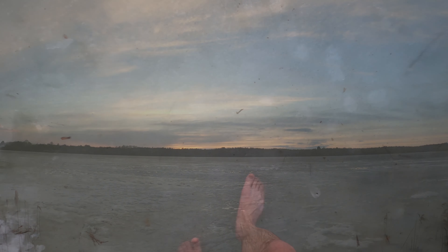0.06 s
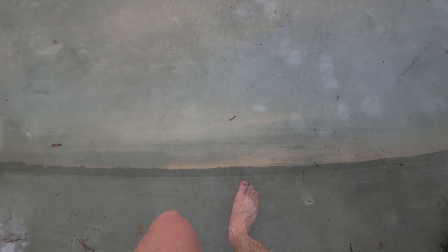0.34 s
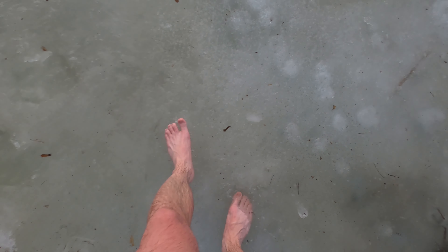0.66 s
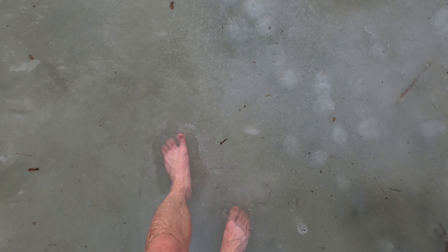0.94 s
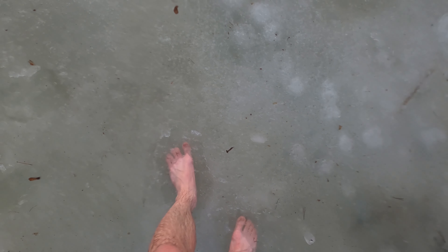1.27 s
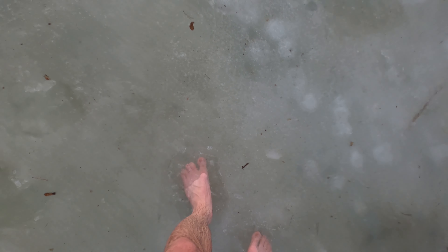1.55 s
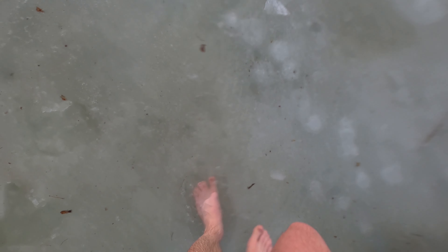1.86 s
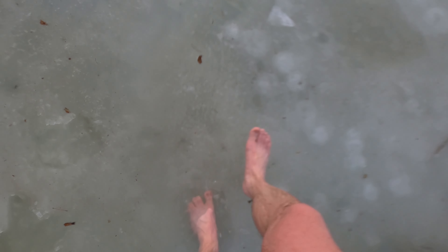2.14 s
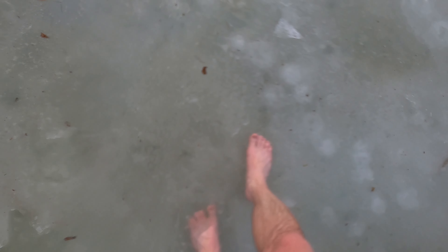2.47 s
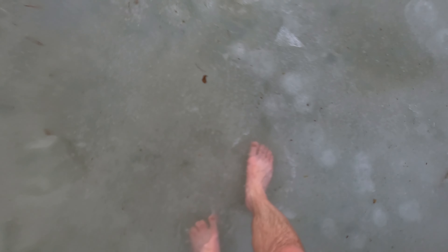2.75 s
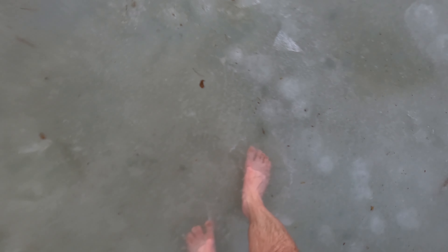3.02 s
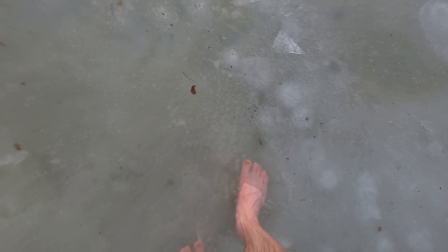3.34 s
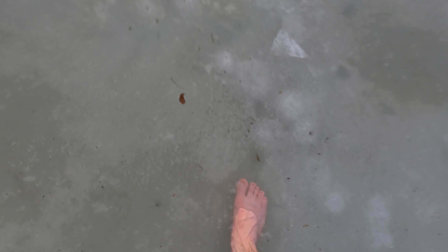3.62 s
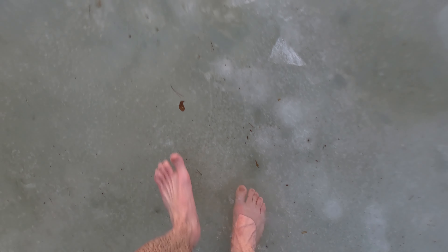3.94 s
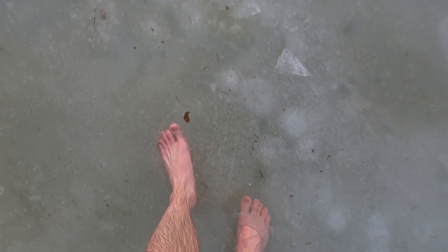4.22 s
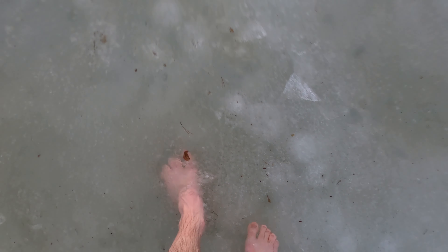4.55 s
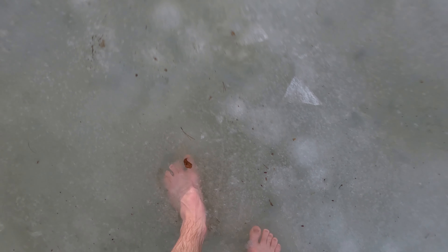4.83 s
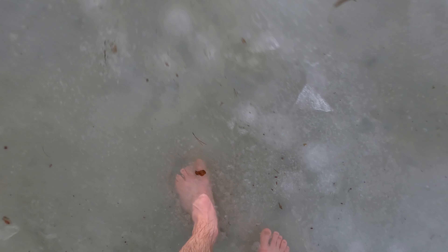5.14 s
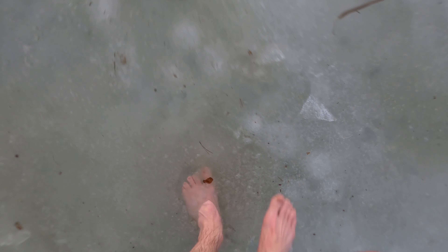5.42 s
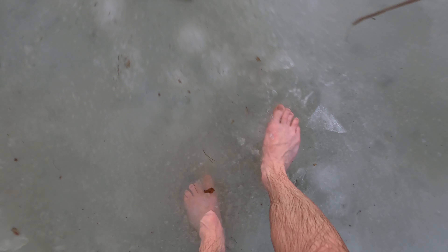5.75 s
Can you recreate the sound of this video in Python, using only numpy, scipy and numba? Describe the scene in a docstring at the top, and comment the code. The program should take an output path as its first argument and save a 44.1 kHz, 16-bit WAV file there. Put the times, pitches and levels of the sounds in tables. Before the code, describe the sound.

Bare feet wade slowly through a few centimetres of water on a frozen lake. Each foot lifts with a gurgle and plinking drips, throws a little spray, then sinks back with a soft slosh and fading fizz. About four unhurried steps pass, with the sharpest splashes in the second half. A few dull low thumps come between them. The sound is close and dry, with no echo, over a very faint outdoor hush.

```python
"""Wading through meltwater on ice.

Bare feet wade slowly through a few centimetres of water on a frozen lake, in still open air.
Each foot churns up big bubbles, throws spray and leaves fizzing foam. The lifted foot drips,
and the drops slap and ring as bubbles of rising pitch. Two close microphone ports hear it.
Now and then comes a dull low thump, from a footfall or a puff or bump at the microphone."""
import sys
import numpy as np
from scipy import signal
from scipy.fft import rfft, irfft, next_fast_len
from scipy.io import wavfile
from numba import njit

SR = 44100
rng = np.random.default_rng(int(sys.argv[2]) if len(sys.argv) > 2 else 0)


def inscribe(sig):
    """Save sig as 16-bit PCM at rate SR to the path in sys.argv[1].

    A 1-D sig is mono; a 2-D sig holds one channel per row.
    Samples are clipped to [-1, 1] before scaling.
    """
    pcm = np.round(np.clip(np.atleast_2d(sig).T, -1, 1) * 32767)
    wavfile.write(sys.argv[1], SR, pcm.astype(np.int16))


N = 255339

# Bubble cloud spectra: freq_hz, gain_db
CHURN_SPECTRUM = [(70, -45.5), (130, -14), (200, -4.5), (320, -5), (480, -3), (700, -6.5), (1000, -7),
                  (1600, -10)]
SPLASH_SPECTRUM = [(450, -29), (750, -17), (1100, -3), (1900, 0.5), (2800, -0.5), (3600, -6.5),
                   (5000, -9.5), (8000, -50.5)]
FOAM_SPECTRUM = [(2000, -35), (3300, -6), (4300, -4), (5800, -5), (7400, -7), (8600, -14), (11000, -16.5),
                 (15000, -21)]


def wash(churning, splashing, gurgling, fizzing):
    """Big pockets churn under the sole, spray crackles, the footprint gurgles shut, foam fizzes."""
    churn = cloud(churning, CHURN_SPECTRUM, low_hz=123.5, high_hz=1300, cycles=4.9, glide=.27,
                  scatter_db=2, crowding=.22, spread_samples=.15, count=6000)
    splash = cloud(splashing, SPLASH_SPECTRUM, low_hz=600, high_hz=5000, cycles=15, glide=.25,
                   scatter_db=3, crowding=.38, spread_samples=.15, count=16000)
    gurgle = cloud(gurgling, SPLASH_SPECTRUM, low_hz=650, high_hz=3600, cycles=32, glide=.55,
                   scatter_db=3, crowding=.18, spread_samples=.26, count=3600)
    foam = cloud(fizzing, FOAM_SPECTRUM, low_hz=2800, high_hz=15000, cycles=36, glide=.041,
                 scatter_db=5, crowding=.32, spread_samples=.47, count=56000)
    return undb(-4) * churn + undb(-.5) * splash + gurgle + undb(4.5) * foam


def cloud(stir, spectrum, low_hz, high_hz, cycles, glide, scatter_db, crowding, spread_samples, count):
    """A swarm of bubbles of all sizes: harder stirring makes them more numerous and louder."""
    when, pitch, luck, length, sign = rng.random((count, 5)).T
    loud, place = rng.standard_normal((count, 2)).T
    start_s = when * N / SR
    strength = stir[(when * N).astype(int)]
    chance = np.minimum(strength / undb(-45.5), 1) ** crowding
    born = luck < chance
    hz = low_hz * (high_hz / low_hz) ** pitch
    t60_s = cycles * 2 ** (2 * length - 1) / hz
    gain = np.sign(sign - .5) * undb(scatter_db * np.minimum(loud, 2)) * strength
    gain *= np.sqrt(hz / t60_s / chance)  # small bubbles die sooner: louder for equal power per Hz
    lag = port_lag(start_s) + spread_samples * place
    swarm = ring(start_s[born], hz[born], gain[born], t60_s[born], glide * 2 * length[born], lag[born])
    swarm = colour(swarm, spectrum)
    return swarm * np.sqrt(np.mean(stir) / np.mean(swarm ** 2 / stir))


# Weight shifts, water laps the ankle: full_s, hold_s, lap_db, swirl_db
ANKLE_LEANS = [(0.096, 0.37, -67, -82.5), (3.426, 0.66, -67, -67.5), (5.315, 0.33, -52, -77)]
# Foot lifts, water refills the hollow: full_s, hold_s, level_db
FOOT_LIFTS = [(0.331, 0.0036, -46.5), (1.857, 0.03, -48), (3.773, 0.068, -43), (3.955, 0.022, -47),
              (5.414, 0.028, -41.5), (5.589, 0.011, -46)]
# Swinging foot throws water: full_s, rise_s, hold_s, fall_s, splash_db, churn_db, foam_db
FOOT_SWINGS = [(0.75, .085, 0.024, .075, -38.5, -48, -49), (1.836, .01, 0.0021, .03, -42, -38, -46),
               (2.065, .035, 0.053, .035, -54, -57, -63), (2.325, .02, 0.053, .25, -47, -53.5, -56.5),
               (3.446, .01, .005, .04, -63.5, -59, -67), (4.007, .05, 0.0044, .07, -47.5, -53, -48),
               (4.125, .04, 0.11, .1, -57.5, -65, -58), (4.406, .012, 0.0057, .015, -22, -23.5, -35.5),
               (5.737, .04, 0.023, .07, -40.5, -47, -43.5), (5.774, 0.017, 0.011, .07, -31, -42.5, -42.5)]
# Foot sinks to the ice: full_s, rise_s, hold_s, churn_db, splash_db, foam_db, swirl_db, swirl_hz
FOOT_PLUNGES = [(0.867, .05, 0.12, -38.5, -43.5, -58, -42, 281),
                (2.548, 0.081, 0.099, -35.5, -45, -58, -40, 372),
                (4.348, 0.11, 0.12, -36, -38.5, -50.5, -56, 520),
                (4.621, 0.0506, 0.074, -58, -49, -60, -55.5, 464)]
LEAN_FALL_S, PLUNGE_FALL_S = .1, .049


def stirring(peel_rise_s=.072, lift_fall_s=.11, spray_rise_s=.14, calm_db=-91.5):
    """Feet lean, lift, swing and plunge, stirring the water: gains of churn, splash, gurgle, foam."""
    churn, splash, gurgle, foam = [], [], [], []
    for full_s, hold_s, lap_db, _ in ANKLE_LEANS:
        lap = undb(lap_db) * swell(full_s, .06, hold_s, LEAN_FALL_S)
        splash.append(lap)
        foam.append(lap * undb(-8))
    for full_s, hold_s, level_db in FOOT_LIFTS:
        # the sole peels out of the water, which then trickles off it
        peel = undb(level_db) * swell(full_s, peel_rise_s, hold_s, lift_fall_s)
        trickle = undb(-68.5) * swell(full_s, peel_rise_s, hold_s, fall_s=.67)
        gurgle.append(undb(level_db) * swell(full_s, .017, hold_s, lift_fall_s))
        splash.append(peel * undb(-5))
        foam += [peel * undb(-15.5), trickle]
    for full_s, rise_s, hold_s, fall_s, splash_db, churn_db, foam_db in FOOT_SWINGS:
        throw = swell(full_s, rise_s, hold_s, fall_s)
        splash.append(throw * undb(splash_db))
        churn.append(throw * undb(churn_db))
        foam.append(throw * undb(foam_db))
    for full_s, rise_s, hold_s, churn_db, splash_db, foam_db, _, _ in FOOT_PLUNGES:
        spray = swell(full_s, spray_rise_s, hold_s, fall_s=.12)
        ripples = undb(-61) * swell(full_s, spray_rise_s, hold_s, fall_s=.46)
        fizz = undb(foam_db - 7) * swell(full_s, spray_rise_s, hold_s, fall_s=.84)
        churn.append(undb(churn_db) * swell(full_s, rise_s, hold_s, PLUNGE_FALL_S))
        splash += [spray * undb(splash_db), ripples]
        foam += [spray * undb(foam_db), fizz]
    return [np.sqrt(sum(gain ** 2 for gain in layer) + undb(calm_db) ** 2)
            for layer in (churn, splash, gurgle, foam)]


def swirl(lean_hz=293, lean_rise_s=.2, growth_db=6):
    """Water swirls softly round a leaning ankle and gathers more strongly round a sinking foot."""
    leaning = sum(undb(swirl_db) * swell(full_s, lean_rise_s, hold_s, LEAN_FALL_S)
                  for full_s, hold_s, _, swirl_db in ANKLE_LEANS)
    out = eddy(lean_hz, leaning)
    for full_s, rise_s, hold_s, _, _, _, swirl_db, swirl_hz in FOOT_PLUNGES:
        depth = np.clip((np.arange(N) / SR - full_s) / hold_s, 0, 1)
        gain = undb(swirl_db + growth_db * (depth - .5))
        out += eddy(swirl_hz, gain * swell(full_s, rise_s, hold_s, PLUNGE_FALL_S))
    return out


def eddy(centre_hz, envelope, width_oct=.28, cycles=13, glide=.11, count=3200):
    """Large slow air pockets roll round the ankle, all of about one size."""
    start_s = rng.random(count) * N / SR
    pitch, gain = rng.standard_normal((count, 2)).T
    hz = centre_hz * 2 ** (width_oct * pitch)
    pockets = ring(start_s, hz, gain, cycles / hz, np.full(count, glide), port_lag(start_s))
    return pockets / rms(pockets) * envelope


# Single trapped bubbles: start_s, pitch_hz, level_db, t60_s
TRAPPED_BUBBLES = [(.164, 554, -52.5, 0.037), (.256, 5470, -44, 0.014), (.2592, 1760, -29.5, 0.0046),
                   (0.334, 2720, -30, 0.023), (0.341, 1494, -35, 0.044), (.374, 2370, -37, 0.016),
                   (.409, 2670, -59, .015), (.457, 5980, -47, 0.018), (.544, 2820, -46.5, 0.014),
                   (.614, 2380, -49.5, .026), (0.6624, 2830, -27.5, 0.0092), (0.743, 1970, -25.5, .011),
                   (0.849, 3520, -30, 0.018), (1.173, 4170, -43, 0.016), (1.354, 4400, -44, .004),
                   (1.485, 4100, -45.5, .009), (1.857, 720, -30, 0.039), (1.906, 810, -44, 0.066),
                   (1.916, 2110, -37.5, 0.026), (2.069, 1310, -31.5, 0.0088), (2.1086, 3150, -21, 0.0045),
                   (2.3553, 2200, -23.5, 0.0091), (2.366, 2000, -21, 0.0052), (2.912, 3680, -54, .009),
                   (3.10, 3560, -50, .013), (3.768, 594, -29.5, 0.05), (3.7697, 2080, -19, 0.0053),
                   (3.793, 676, -34.5, 0.045), (3.794, 2120, -21.5, .014), (3.8432, 1954, -29.5, .033),
                   (3.888, 1260, -29.5, 0.0057), (3.9476, 1277, -26, 0.0653), (3.973, 2170, -29, 0.011),
                   (3.98, 1130, -32.5, 0.032), (4.26, 2175, -22.5, 0.017), (4.309, 2800, -16.5, 0.015),
                   (4.402, 5410, -12, 0.011), (4.4055, 554, -19, 0.0093), (4.4082, 985, -8.5, 0.01),
                   (4.4435, 2940, -20, 0.025), (4.4852, 2620, -26.5, .04), (4.4854, 1520, -19.5, 0.027),
                   (4.521, 1222, -36.5, 0.061), (5.032, 5910, -35, 0.0093), (5.116, 4500, -34, 0.0022),
                   (5.348, 1100, -39, .042), (5.422, 1360, -12.5, 0.0079), (5.425, 1790, -7.5, 0.01),
                   (5.431, 833, -36, 0.062), (5.443, 2700, -31, 0.014), (5.455, 630, -40, 0.061),
                   (5.456, 2700, -31, 0.022), (5.529, 956, -34, 0.028), (5.531, 2110, -32, 0.037),
                   (5.579, 946, -29.5, .018), (5.613, 2130, -26.5, .014), (5.667, 3800, -28, 0.011),
                   (5.7414, 3550, -8, 0.0045), (5.775, 3140, -17.5, 0.014), (5.779, 453, -24, 0.021),
                   (5.7857, 2660, -19.5, 0.012)]


def bubbles(twin_db=-6, detune_oct=.13, splinter_db=-10, spread_oct=.55, cycles=7, splinters=10):
    """Falling drops trap bubbles that plink; each sheds a beating twin and splinters that roughen it."""
    start_s, hz, level_db, t60_s = np.array(TRAPPED_BUBBLES).T.copy()
    glide = .5 * (t60_s / .025) ** .25  # longer rings rise further
    lag = port_lag(start_s)
    out = ring(start_s, hz, undb(level_db), t60_s, glide, lag)
    wait, detune = rng.random((len(hz), 2)).T
    twin_s = start_s + .12 * t60_s * (.5 + wait)
    twin_hz = hz * 2 ** (detune_oct * (.5 + detune))
    out += ring(twin_s, twin_hz, undb(level_db + twin_db), t60_s / 2, np.zeros_like(hz), lag)
    for _ in range(splinters):
        late, pitch = rng.random((len(hz), 2)).T
        splinter_s = start_s + .61 * np.minimum(t60_s, .04) * (late - .1)
        splinter_hz = np.minimum(np.maximum(hz, 1000) * 2 ** (spread_oct * (3 * pitch - 1)), 7500)
        gain = undb(level_db + splinter_db - 2 * late)
        out += ring(splinter_s, splinter_hz, gain, cycles / splinter_hz, .3 * late, lag)
    return out


# Water hitting water or skin: start_s, level_db, length_s, centre_hz
WATER_SLAPS = [(0.302, -37, 0.0012, 7000), (0.664, -30, 0.0023, 5200), (1.8334, -15.5, 0.0014, 4200),
               (1.8376, -33, 0.0022, 4100), (2.364, -23, 0.0013, 5840), (2.482, -37, 0.00079, 5000),
               (2.523, -30.5, 0.0056, 5800), (3.4424, -34, 0.0051, 2200), (3.444, -27.5, 0.0023, 3400),
               (3.7668, -23.5, 0.0012, 1300), (4.262, -26, 0.0039, 4830), (4.4022, -24, 0.0056, 5100),
               (4.4029, -10.5, 0.0029, 975), (4.409, -19.5, .005, 785), (4.41, -20, 0.0042, 2200),
               (4.418, -30.5, 0.002, 1200), (4.4604, -23, 0.0022, 3015), (4.463, -23.5, 0.0065, 1930),
               (5.7737, -18.5, .003, 1680), (5.4253, -23, 0.0019, 4100), (5.7792, -11.5, 0.00057, 5650)]


def slaps(cycles=2.55, width_oct=.67, fade_db=9, count=20):
    """A sheet of water collapses in a quick volley of barely ringing pockets."""
    out = np.zeros((2, N))
    for start_s, level_db, length_s, centre_hz in WATER_SLAPS:
        progress = (np.arange(count) + rng.random(count)) / count
        pocket_s = start_s + length_s * progress
        hz = np.minimum(centre_hz * 2 ** (width_oct * rng.standard_normal(count)), 7400)
        gain = rng.choice([-1., 1.], count) * undb(-fade_db * progress)
        volley = ring(pocket_s, hz, gain, cycles / hz, np.zeros(count), port_lag(pocket_s))
        volley_rms = np.sqrt((np.sum(volley ** 2) + 1e-18) / (2 * length_s * SR))
        out += undb(level_db) * volley / (2 * volley_rms)  # crest factor about 2
    return out


def drips(level_db=-43, fade_db_per_s=65, span_s=.27, centre_hz=2000, width_oct=.63, count=9):
    """Small drops fall off each lifted foot and plink ever more faintly."""
    out = np.zeros((2, N))
    for lift_s, _, _ in FOOT_LIFTS:
        delay_s = span_s * (np.arange(count) + rng.random(count)) / count
        pitch, loud = np.clip(rng.standard_normal((count, 2)), -2, 2).T
        start_s = lift_s + delay_s
        hz = centre_hz * 2 ** (width_oct * pitch)
        gain = undb(level_db - fade_db_per_s * delay_s + 3 * loud)
        out += ring(start_s, hz, gain, t60_s=42 / hz, glide=np.full(count, .5), lag=port_lag(start_s))
    return out


def foam_pips(fizzing, centre_hz=4700, width_oct=.36, level_db=-49, scatter_db=6, count=200):
    """Lone foam bubbles burst with a tick or a brief ring, fainter as the water settles."""
    when, length = rng.random((count, 2)).T
    pitch, loud, place = rng.standard_normal((count, 3)).T
    start_s = when * N / SR
    hz = centre_hz * 2 ** (width_oct * np.clip(pitch, -2, 2))
    activity = fizzing[(when * N).astype(int)] / fizzing.max()
    gain = undb(level_db + scatter_db * np.minimum(loud, 2)) * activity ** .3
    lag = port_lag(start_s) + .5 * place
    return ring(start_s, hz, gain, t60_s=.002 * 5 ** length, glide=.1 * length, lag=lag)


# Dull low thumps: start_s, pitch_hz, level_db, t60_s, left_minus_right_db
LOW_THUMPS = [(0.521, 337, -48, 0.017, 2), (0.994, 238, -23, 0.03, 0), (0.999, 45, -39.5, .1, 0),
              (2.094, 185, -34.5, 0.025, -1.5), (3.7104, 330, -31.5, 0.013, 3),
              (3.7211, 250, -13.5, 0.016, 1), (3.724, 106, -29, 0.052, 0), (4.402, 183, -37.5, 0.11, 3),
              (4.407, 25.54, -27, 0.13, 2), (4.855, 49, -29, 0.075, 12), (4.859, 156, -30, 0.03, 4)]


def thumps():
    """Dull low thumps, from footfalls or a puff or bump at the microphone."""
    start_s, hz, level_db, t60_s, pan_db = np.array(LOW_THUMPS).T.copy()
    zero = np.zeros_like(hz)
    gains = [undb(level_db + side * pan_db / 2) for side in (1, -1)]
    return np.array([ring(start_s, hz, gain, t60_s, glide=zero, lag=zero)[0] for gain in gains])


# Still air spectrum: freq_hz, gain_db
AIR_SPECTRUM = [(25, 0.5), (60, -7), (110, -10), (170, -0.5), (300, -10), (700, -12.5), (2000, -18),
                (6000, -25.5), (9000, -22), (15000, -50)]


def air(level_db=-74, side_db=-8):
    """Faint hush of the open lake, nearly alike at both ports."""
    mid, side = colour(rng.standard_normal((2, N)), AIR_SPECTRUM)
    hush = mid + undb(side_db) * side * np.array([[1], [-1]])
    return hush * undb(level_db) / rms(hush)


@njit
def ring(start_s, hz, gain, t60_s, glide, lag):
    """Air pockets ring down; near the surface their pitch rises, about glide octaves per t60."""
    out = np.zeros((2, N))
    for k in range(len(start_s)):
        for side in range(2):
            onset = start_s[k] * SR + lag[k] * (.5 - side)
            last_flow = 0.
            for i in range(max(int(onset) + 1, 0), min(int(onset + t60_s[k] * SR), N)):
                t = (i - onset) / SR
                age = t / t60_s[k]
                cycles = hz[k] * t * (1 + .35 * glide[k] * age)
                flow = np.exp(-6.9 * age) * (1 - np.exp(-1.6 * cycles)) * np.sin(2 * np.pi * cycles)
                # pressure follows the change of flow
                out[side, i] += gain[k] * (flow - last_flow) * SR / (2 * np.pi * hz[k])
                last_flow = flow
    return out


# Direction of the splashes: time_s, left_lag_samples
SPLASH_BEARING = [(0, 0.1), (1, 0), (2.6, 0.23), (3.8, 0.93), (4.4, 1), (5.4, 1.71), (5.79, 1.6)]


def port_lag(at_s):
    """Samples by which a splash reaches the left port after the right."""
    time_s, lag_samples = np.transpose(SPLASH_BEARING)
    return np.interp(at_s, time_s, lag_samples)


def swell(full_s, rise_s, hold_s, fall_s):
    """Gain of one movement: up to 1 at full_s, held, then down. Rise and fall times are per 20 dB."""
    t = np.arange(N) / SR - full_s
    return undb(-20 * (np.maximum(-t, 0) / rise_s + np.maximum(t - hold_s, 0) / fall_s))


def colour(x, points):
    """Filter by a curve of (freq_hz, gain_db) points."""
    hz, db = np.transpose(points)
    size = next_fast_len(N + 4096)
    bin_hz = np.maximum(np.arange(size // 2 + 1) * SR / size, 1)
    gain = undb(np.interp(np.log(bin_hz), np.log(hz), db))
    return irfft(rfft(x, size) * gain, size)[..., :N]


def undb(db):
    """Decibels to gain."""
    return 10 ** (np.asarray(db) / 20)


def rms(x):
    """Root mean square."""
    return np.sqrt(np.mean(x ** 2))


def scene(low_cut_hz=150):
    """Close and dry: open ice sends no echo, and such thin water radiates no deep bass."""
    churning, splashing, gurgling, fizzing = stirring()
    impacts = foam_pips(fizzing) + drips() + bubbles() + slaps()
    # water yields as it is struck, so single impacts have little top
    impacts = colour(impacts, [(7600, .5), (9000, -6.5), (15000, -12)])
    water = wash(churning, splashing, gurgling, fizzing) + swirl() + impacts
    low_cut = signal.butter(3, low_cut_hz, "high", fs=SR, output="sos")
    return signal.sosfilt(low_cut, water) + thumps() + air()


# Housing response to the difference between ports: freq_hz, gain_db
SIDE_RESPONSE = [(1000, 0), (4000, -3.5), (7000, -2.5), (9000, -7.5), (12000, -3)]
# Port responses, left then right: freq_hz, gain_db
PORT_RESPONSES = [
    [(7500, -0.5), (9500, -3), (12500, -7.5), (15000, -13)],
    [(7500, -0.5), (9500, -2), (12500, -3.5), (15000, -2.5)],
]


def record(dry, top_hz=15400):
    """The housing shapes the stereo difference, each port dulls the treble, a low-pass cuts the top."""
    mid = (dry[0] + dry[1]) / 2
    side = colour((dry[0] - dry[1]) / 2, SIDE_RESPONSE)
    dulled = np.array([colour(x, port) for x, port in zip([mid + side, mid - side], PORT_RESPONSES)])
    return signal.sosfilt(signal.ellip(8, .2, 70, top_hz, fs=SR, output="sos"), dulled)


dry = scene()
out = record(dry)
inscribe(out)
```